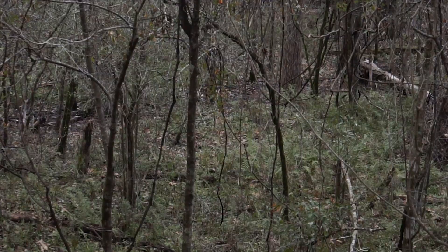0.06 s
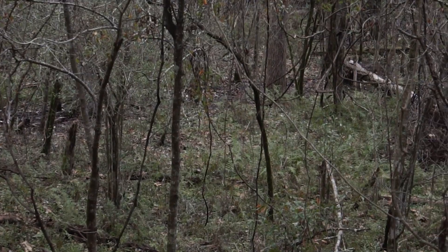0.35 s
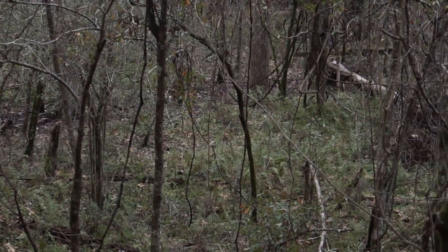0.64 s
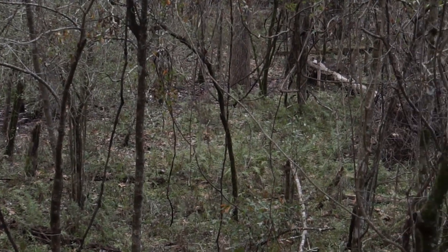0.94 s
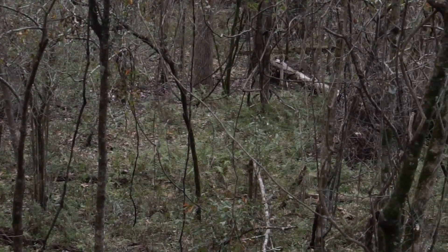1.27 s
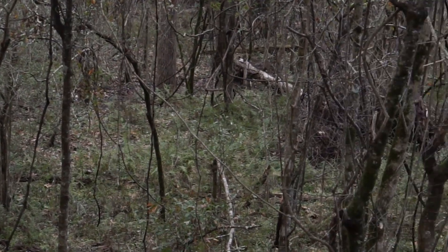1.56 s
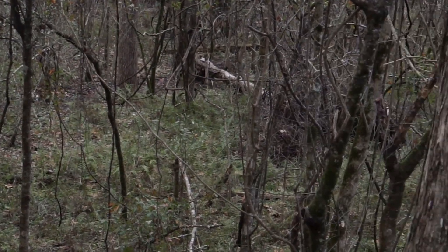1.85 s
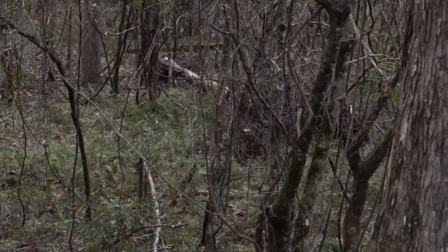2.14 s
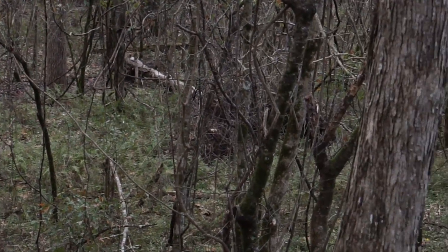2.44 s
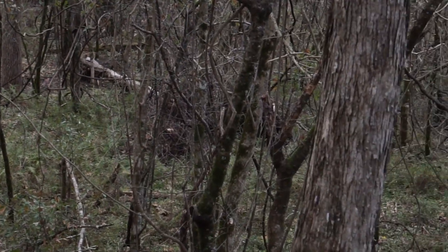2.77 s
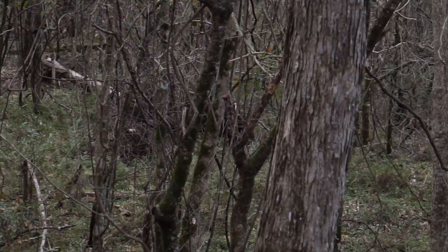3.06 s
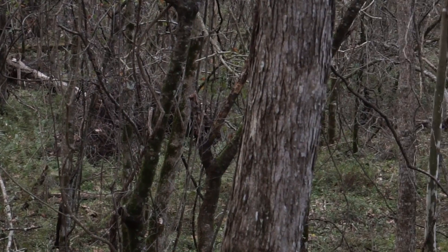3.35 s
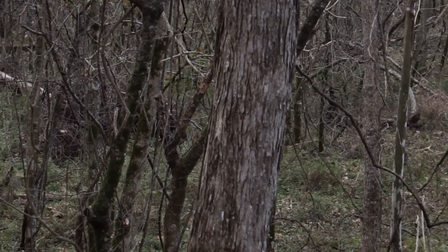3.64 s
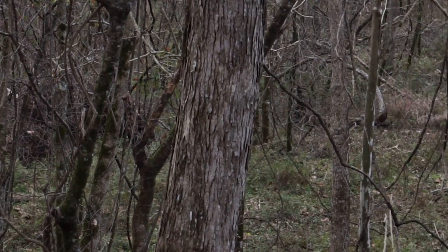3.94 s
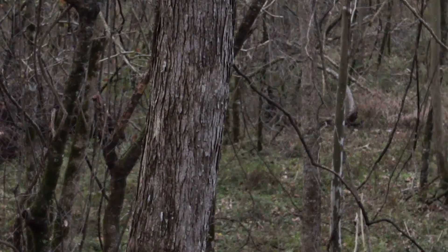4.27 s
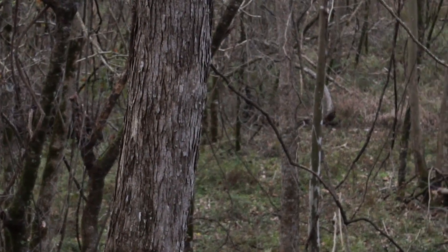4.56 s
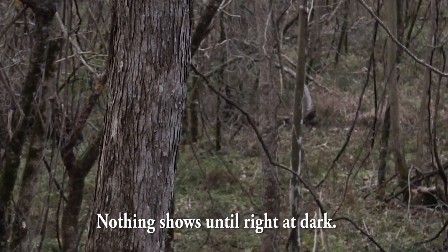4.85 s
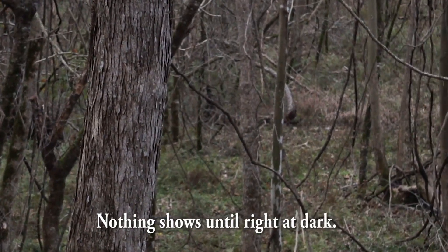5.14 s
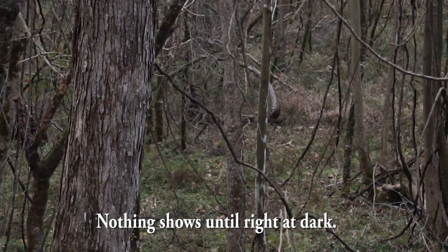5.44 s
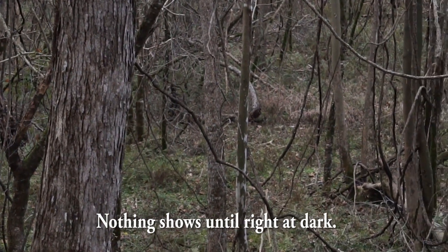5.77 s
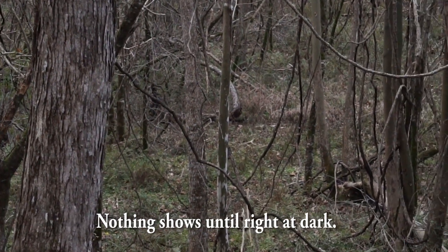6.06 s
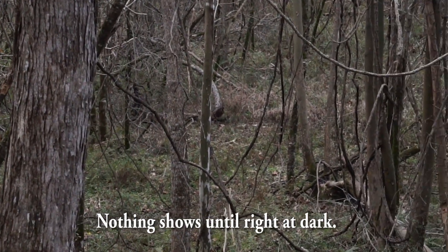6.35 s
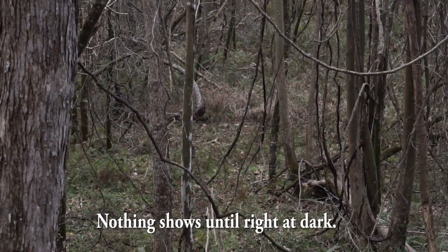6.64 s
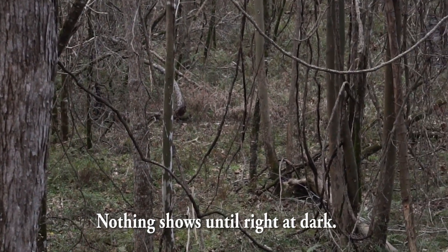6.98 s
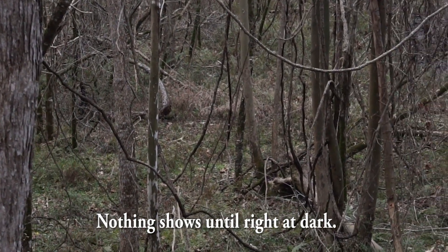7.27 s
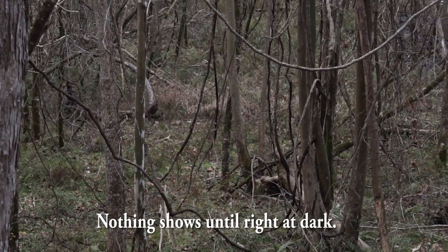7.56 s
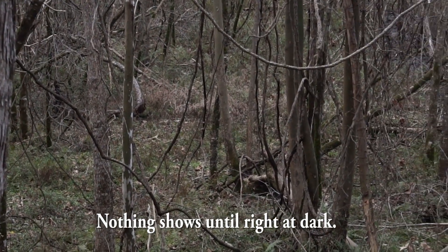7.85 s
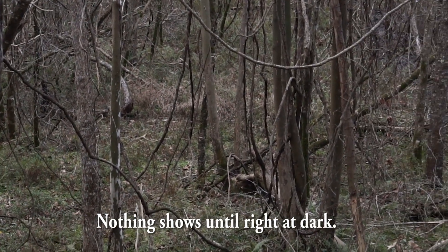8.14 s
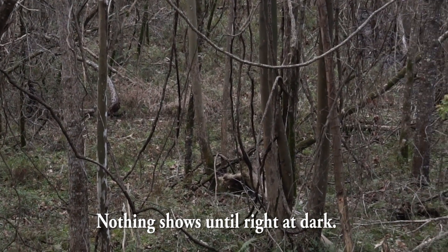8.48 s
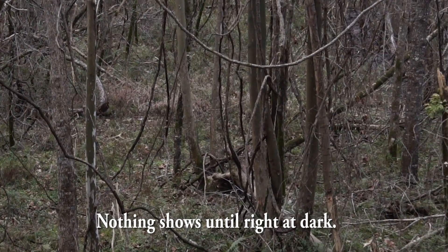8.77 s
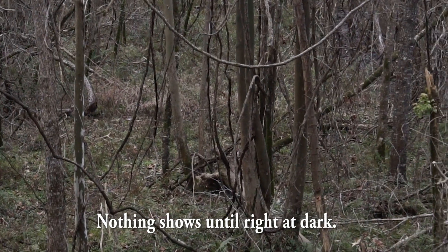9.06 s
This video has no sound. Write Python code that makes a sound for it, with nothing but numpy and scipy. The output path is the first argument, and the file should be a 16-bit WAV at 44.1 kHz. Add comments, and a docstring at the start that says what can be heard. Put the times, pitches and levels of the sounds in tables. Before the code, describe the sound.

A low, distant rumble and a soft hiss of leaves fill a wood, with deep wobble from the moving microphone at first. Above this, a bird calls about once a second: a quick flicked note, then a clear whistle that bends upward, with a short echo. Small chirps and occasional dry twig ticks come between the calls. In the second half the bird sounds farther away.

```python
"""A bird in damp woods repeats a two-part call, a quick upward flick then a rising whistle, later from
farther off. Short chips fall between; all notes are near-pure swept tones, scattered by the trunks.
A few twigs tick nearby as resonant noise bursts. Underneath: distant rumble, faint leaf hiss, a thin
electronic whine and the deep sway of the microphone, which settles as the camera turns."""
import sys
import numpy as np
from scipy import signal
from scipy.fft import rfft, irfft, next_fast_len
from scipy.io import wavfile
from scipy.ndimage import uniform_filter1d, map_coordinates

SR = 44100
rng = np.random.default_rng(int(sys.argv[2]) if len(sys.argv) > 2 else 0)


def materialize(psi):
    """Save the field psi as 16-bit PCM at rate SR to the path in sys.argv[1].

    A 1-D psi becomes a single channel; in a 2-D psi each row is a channel.
    """
    bounded = np.clip(np.atleast_2d(psi).T, -1, 1)
    quanta = np.round(bounded * 32767).astype(np.int16)
    wavfile.write(sys.argv[1], SR, quanta)


N = 410571

# distant rumble: (frequency [Hz], relative density [dB])
RUMBLE_SPECTRUM = [(20, -29), (45, 3.5), (65, -0.5), (110, -0.5), (160, -2), (230, -6.5), (450, -10.5),
                   (700, -15.5), (1000, -20.5), (1500, -27.5), (3000, -35.5), (8000, -77)]
# leaf hiss: (frequency [Hz], relative density [dB])
HISS_SPECTRUM = [(500, -10.5), (1500, 1.5), (2700, -2), (3800, -3), (4800, -6), (5800, -7), (7000, -13),
                 (10000, -16), (15500, -20)]
# soft microphone mount: (frequency [Hz], relative density [dB])
MOUNT_SPECTRUM = [(5, -26), (13, -9.5), (18.5, 1), (24, -11), (35, -19.5), (50, -32.5), (100, -45),
                  (300, -100)]
# jolts to the mount: (peak time [s], level [dB])
MOUNT_JOLTS = [(.14, -11.5), (1.02, -15.5), (1.93, -11), (2.7, -15)]
# handling bumps: (time [s], level [dB], pitch [Hz], length [s])
HANDLING_BUMPS = [(0.888, -17, 41.5, 0.071), (1.032, -18, 62.3, 0.071)]
# echo tail of the woods: (frequency [Hz], T60 [s])
WOODS_T60 = [(500, .9), (2000, 1.83), (3500, 1.24), (8000, .35)]
# twig snaps: (time [s], level [dB], centre [Hz], width / centre [ratio])
TWIG_SNAPS = [(.321, -41, 5000, 1.3), (.572, -30.5, 2000, 1.5), (.618, -36, 4160, 0.32),
              (2.008, -38, 3350, .35), (2.551, -40, 3800, 0.63), (3.133, -27.5, 1994, .64),
              (5.866, -40, 3500, 1.6), (9.231, -39, 4200, 0.71)]
# arched chips: (time [s], top pitch [Hz], level [dB], length [s])
CHIP_NOTES = [(0.839, 2570, -47, 0.038), (1.674, 2550, -47, 0.045), (2.826, 2520, -41.5, 0.044),
              (3.876, 4060, -35.5, .019), (5.88, 1170, -43.5, 0.04), (6.464, 2600, -42.5, .03),
              (6.524, 5420, -52, 0.047), (7.418, 2570, -41.5, 0.03), (7.508, 2570, -43.5, 0.031),
              (7.915, 5450, -52.5, 0.04), (8.524, 4030, -40, .022), (8.618, 3460, -47, .028),
              (8.882, 2520, -44.5, 0.028), (9.008, 2590, -40.5, 0.033)]
# upward flicks: (time [s], pitch at dip [Hz], level [dB])
FLICK_NOTES = [(.995, 2627, -38.5), (2.243, 2610, -39), (3.485, 2652, -38), (4.768, 2590, -39.5),
               (5.921, 2650, -43), (6.468, 2480, -44.5)]
# course of a flick: (position [0-1], pitch re dip [ratio], relative level [dB])
FLICK_CONTOUR = [(0, 1.2, -32), (.14, 1.05, -6.5), (.28, 1, 1), (.47, 1.16, -1.5), (.64, 1.31, -3),
                 (.82, 1.3, -7.5), (1, 1.1, -13)]
# hiccup before a whistle: (time re onset [s], pitch re start [ratio], relative level [dB])
HICCUP_CONTOUR = [(-.052, 1.1, -22), (-.042, 1.15, -5), (-.03, 1.4, -8), (-.021, 1.1, -1.5),
                  (-.014, .985, 3), (-.005, 0.94, -4)]
# whistles: (time [s], length [s], start pitch [Hz], end pitch [Hz], level [dB], swell [dB],
#            echo re direct [dB], pitch quaver [fraction])
WHISTLE_NOTES = [(0.068, 0.22, 1910, 2090, -34, 3.5, -8, 0.0069),
                 (1.235, 0.21, 1927, 2074, -34, -1.5, -7, 0.0046),
                 (2.474, 0.22, 1897, 2093, -37.5, 4.5, -3.5, .009),
                 (3.722, 0.22, 1920, 2056, -35, 5, -5.5, 0.0036),
                 (4.995, 0.195, 1947, 2025, -36, 3, -9, .004),
                 (7.684, .14, 1937, 2056, -44.5, -16, -0.5, .005),
                 (8.831, 0.28, 1915, 2042, -47, -2, -0.5, .005)]


def amp(db):
    """Decibels to gain."""
    return 10 ** (np.asarray(db) / 20)


def unit(x):
    """Scale to rms 1."""
    return x / np.sqrt(np.mean(x ** 2) + 1e-20)


def along(points, hz):
    """Interpolate (Hz, value) points on a log axis."""
    knots_hz, values = np.transpose(points)
    return np.interp(np.log(hz + 1), np.log(knots_hz + 1), values)


def filtered(x, response):
    """Apply response(hz) by FFT."""
    size = next_fast_len(len(x) + SR // 4)
    return irfft(rfft(x, size) * response(np.fft.rfftfreq(size, 1 / SR)), size)[:len(x)]


def wobble(rate_hz, size):
    """Smooth random curve, knots at rate_hz."""
    knots = rng.standard_normal(int(size * rate_hz / SR) + 4)
    return map_coordinates(knots, [np.arange(size) * rate_hz / SR])


def add(track, time_s, x):
    """Mix x into track from time_s."""
    start = max(round(time_s * SR), 0)
    part = track[start:start + len(x)]
    part += x[:len(part)]


def loose_times(gap_s):
    """One random time per slot of gap_s."""
    times_s = (np.arange(32) + rng.random(32)) * gap_s
    return times_s[times_s < N / SR]


def rush(spectrum, patchy_db):
    """Coloured noise, rms 1, with soft patches of random gain."""
    bins = signal.stft(rng.standard_normal(N), nperseg=512)[2]
    patches = uniform_filter1d(rng.standard_normal(bins.shape), size=6, axis=0)
    patches = uniform_filter1d(patches, size=16, axis=1)
    noise = signal.istft(bins * amp(patchy_db * unit(patches)), nperseg=512)[1][:N]
    return unit(filtered(noise, lambda hz: amp(along(spectrum, hz))))


def air():
    """Steady far rumble; slowly easing leaf hiss."""
    rumble_db, hiss_db, fall_db_per_s = -32, -46.5, 0.2638
    rumble = amp(rumble_db) * rush(RUMBLE_SPECTRUM, patchy_db=0.5)
    hiss = amp(hiss_db - fall_db_per_s * np.arange(N) / SR) * rush(HISS_SPECTRUM, patchy_db=1.0)
    return rumble + hiss


def whine(hz=15143, db=-75):
    """Thin tone from the camera's electronics."""
    return amp(db) * np.sin(2 * np.pi * hz * np.arange(N) / SR)


def swing():
    """Sway envelope: settling unrest plus decaying jolts, summed in power."""
    start_db, rest_db, settle_s, wander_db = -21, -26, 4.95, 2.1
    rise_s, fall_db_per_s = 0.14, 31
    t = np.arange(N) / SR
    unrest_db = np.interp(t, [0, settle_s], [start_db, rest_db]) + wander_db * wobble(6.5, N)
    jolts = []
    for peak_s, db in MOUNT_JOLTS:
        rise = np.interp(t, [peak_s - rise_s, peak_s], [0, 1])
        jolts.append(rise * amp(db - fall_db_per_s * np.maximum(t - peak_s, 0)))
    return np.linalg.norm([amp(unrest_db), *jolts], axis=0)


def handling():
    """The microphone sways on its soft mount and takes dull bumps."""
    sway = rush(MOUNT_SPECTRUM, patchy_db=0.0)
    power = np.abs(uniform_filter1d(sway ** 2, size=SR // 5))
    sway /= np.sqrt(power + 0.021)  # even out the level
    out = swing() * sway
    for time_s, db, hz, length_s in HANDLING_BUMPS:
        t = np.arange(int(length_s * SR)) / SR
        add(out, time_s, amp(db) * np.hanning(len(t)) * np.sin(2 * np.pi * hz * t))
    return out


def woods(x, echo_db):
    """Direct sound, quick echoes off near trunks, long tail from deep in the wood."""
    near_db, near_t60_s, build_s = -1.5, 0.19, 0.0019
    hz, t, bins = signal.stft(rng.standard_normal(SR * 3 // 2), SR, nperseg=256)
    near = amp(near_db - 60 * t / near_t60_s)
    far = amp(-60 * t / along(WOODS_T60, hz)[:, None])
    onset = 1 - np.exp(-t / build_s)
    impulse_response = signal.istft(bins * (near + far) * onset, SR, nperseg=256)[1]
    echo = signal.fftconvolve(x, impulse_response)
    echo *= amp(echo_db) * np.linalg.norm(x) / np.linalg.norm(echo)
    return np.pad(x, (0, len(echo) - len(x))) + echo


def twigs():
    """Dry twigs snap and tick: brief noise through one broad, steep-sided resonance."""
    t60_s = 0.02
    tick_db, tick_hz, tick_width = -47, 5160, 0.74
    out, t = np.zeros(N), np.arange(SR // 8) / SR
    ticks = [(time_s, tick_db + rng.normal(0, 2.2), tick_hz * 2 ** rng.normal(0, 0.15), tick_width)
             for time_s in loose_times(gap_s=1.1)]
    for time_s, db, centre_hz, width in TWIG_SNAPS + ticks:
        def resonance(hz):
            return (1j * hz * centre_hz / (centre_hz ** 2 - hz ** 2 + 1j * hz * centre_hz * width)) ** 2
        burst = unit(filtered(rng.standard_normal(len(t)), resonance))
        add(out, time_s, woods(amp(db - 60 * t / t60_s) * burst, echo_db=-3.5))
    return out


def syrinx(hz, db):
    """Bird's voice: near-pure tone on pitch and level curves, soft ends."""
    phase = 2 * np.pi * np.cumsum(hz) / SR
    tone = np.sin(phase) + amp(-47) * np.sin(2 * phase)
    return np.sqrt(2) * amp(db) * tone * signal.windows.tukey(len(hz), .06)


def chips():
    """Short arched notes; the quicker the note, the deeper and less steady its arch."""
    ref_depth_oct, ref_length_s = 0.259, .03
    out = np.zeros(N)
    for time_s, top_hz, db, length_s in CHIP_NOTES:
        position = np.linspace(-1, 1, int(length_s * SR))
        depth_oct = ref_depth_oct * (ref_length_s / length_s) ** 2.39
        arch_oct = depth_oct * (0.099 * wobble(483, len(position)) - np.abs(position) ** 1.59)
        level_db = db - 7 * (position + 0.27) ** 2  # loudest just before the top
        add(out, time_s, woods(syrinx(top_hz * 2 ** arch_oct, level_db), echo_db=-3.5))
    return out


def flicks(length_s=.045):
    """Quick notes that dip, then leap upward."""
    out, position = np.zeros(N), np.linspace(0, 1, int(length_s * SR))
    knots, ratio, shape_db = np.transpose(FLICK_CONTOUR)
    for time_s, dip_hz, db in FLICK_NOTES:
        hz = dip_hz * np.interp(position, knots, ratio)
        level_db = db + np.interp(position, knots, shape_db)
        add(out, time_s, woods(syrinx(hz, level_db), echo_db=-1.5))
    return out


def whistles():
    """A hiccup arches over and drops into a whistle that holds, then bends upward."""
    quaver_rate_hz, flutter_rate_hz = 167.0, 80.3
    out = np.zeros(N)
    lead_s, lead_ratio, lead_db = np.transpose(HICCUP_CONTOUR)
    for time_s, length_s, start_hz, end_hz, db, swell_db, echo_db, quaver in WHISTLE_NOTES:
        t = np.arange(lead_s[0], length_s + 0.02, 1 / SR)
        rise_hz = (end_hz - start_hz) * np.clip(t / length_s, 0, 1) ** 1.25
        hz = start_hz * np.interp(t, [*lead_s, 0], [*lead_ratio, 1]) + rise_hz
        hz *= 1 + quaver * wobble(quaver_rate_hz, len(t))
        knots_s = [*lead_s, .005, length_s - .012, t[-1]]
        shape_db = np.interp(t, knots_s, [*lead_db, 0, swell_db, swell_db - 19])
        flutter_db = 1.5 * wobble(flutter_rate_hz, len(t))  # mimics beating of paths round the trunks
        add(out, time_s + t[0], woods(syrinx(hz, db + shape_db + flutter_db), echo_db))
    return out


def scene():
    """Bird and twigs over woodland air and camera noises; mono."""
    return (air() + handling() + whine() + whistles() + flicks() + chips() + twigs())[None]


def record(dry):
    """Brick-wall low-pass."""
    top_hz = 15800
    return np.array([filtered(channel, lambda hz: hz < top_hz) for channel in dry])


dry = scene()
out = record(dry)
materialize(out)
```